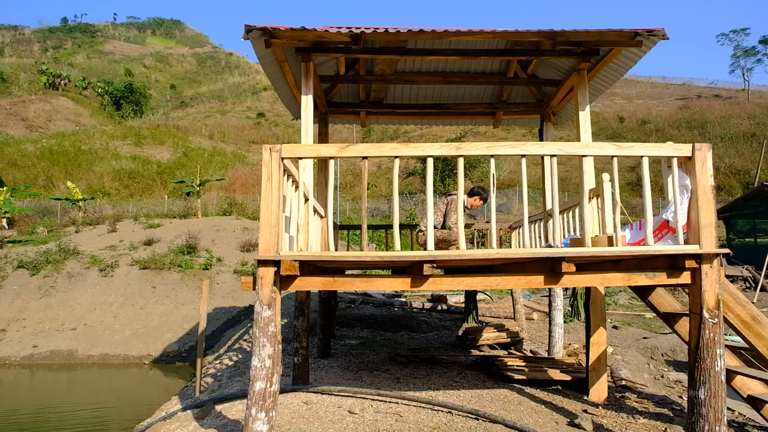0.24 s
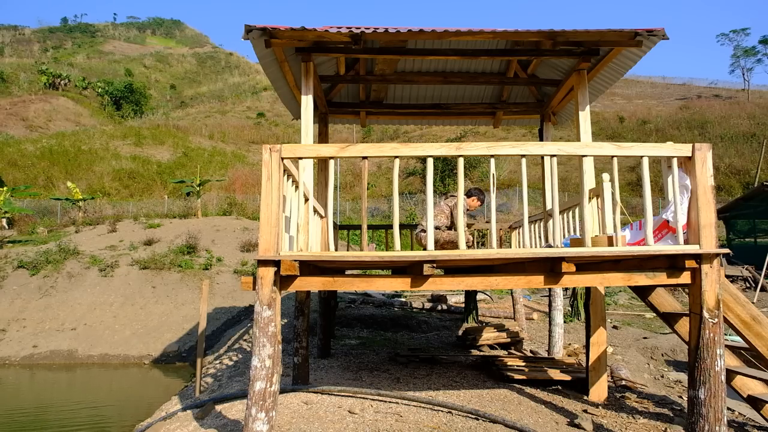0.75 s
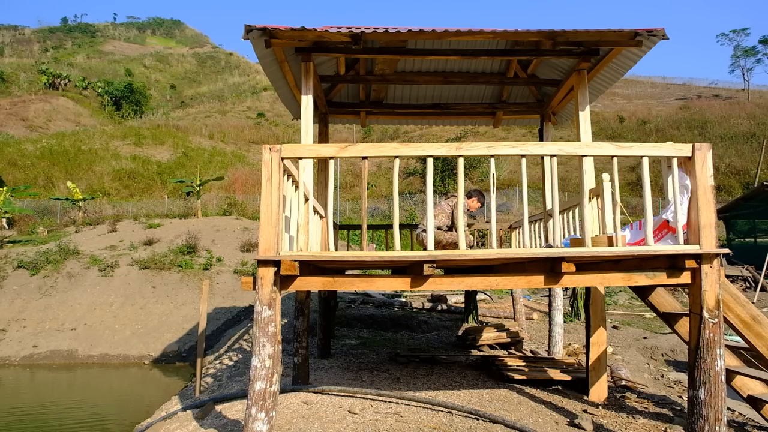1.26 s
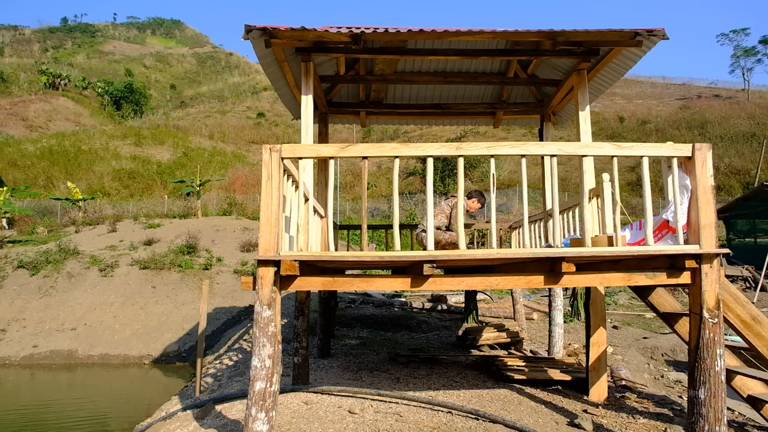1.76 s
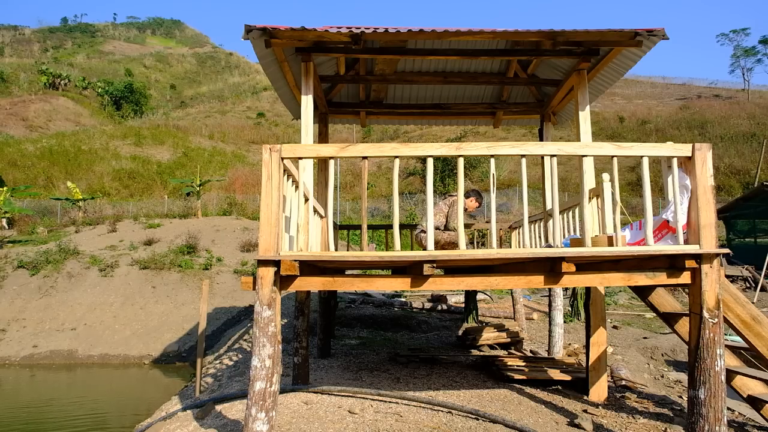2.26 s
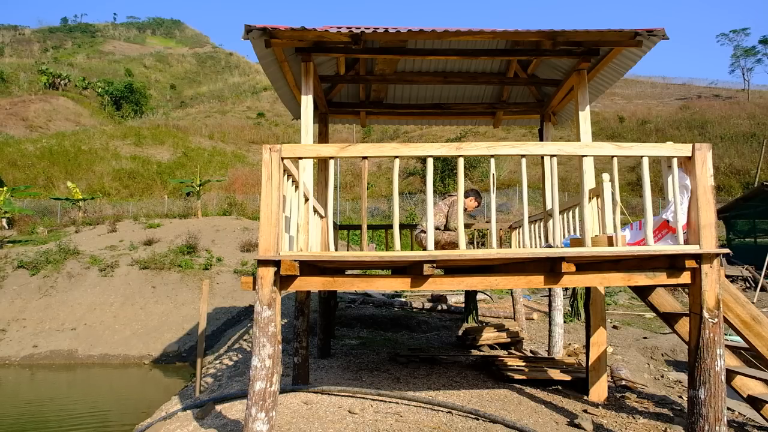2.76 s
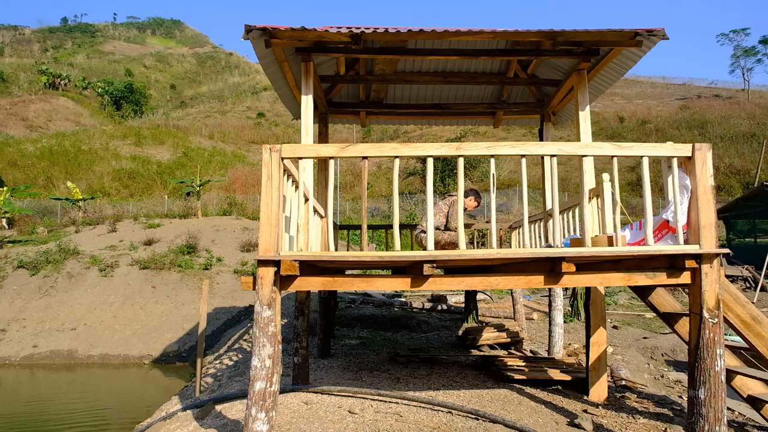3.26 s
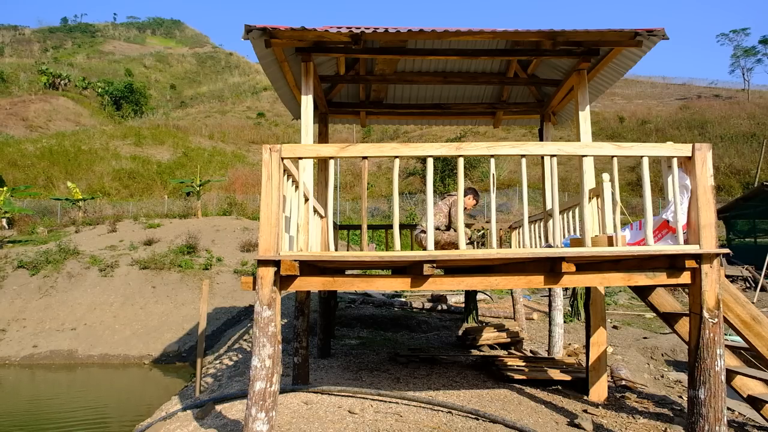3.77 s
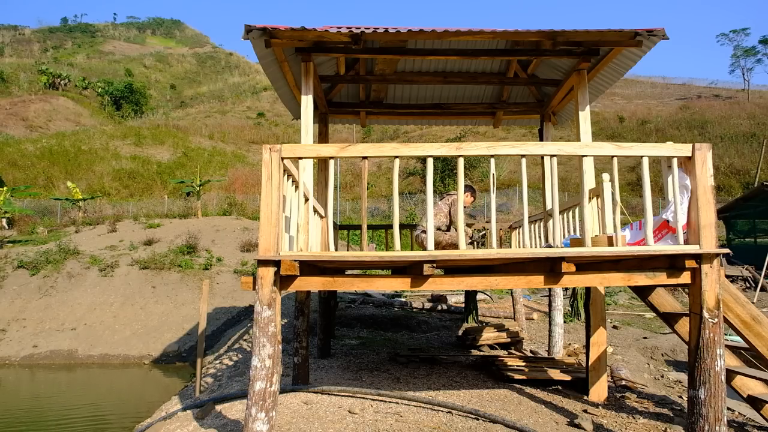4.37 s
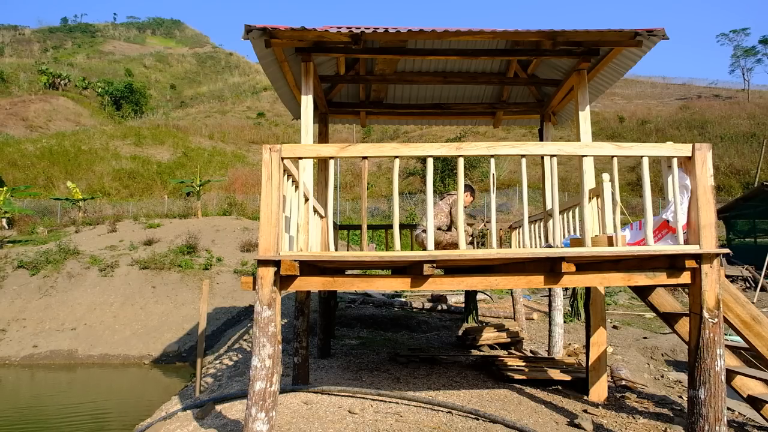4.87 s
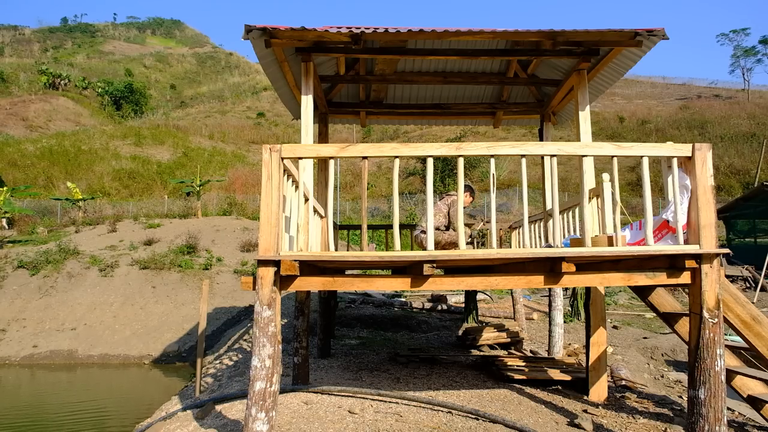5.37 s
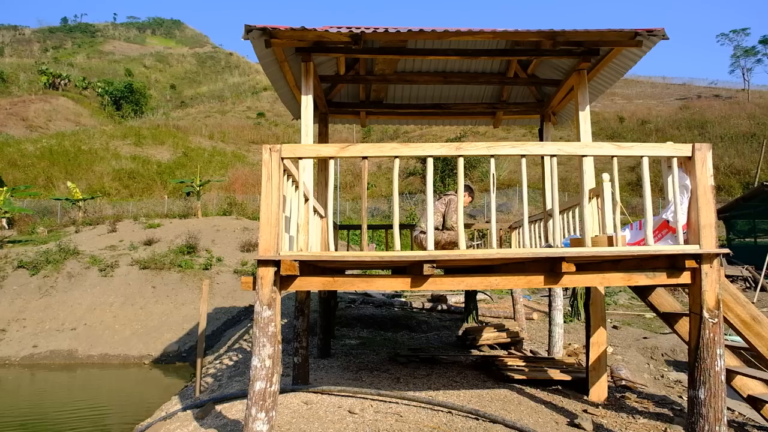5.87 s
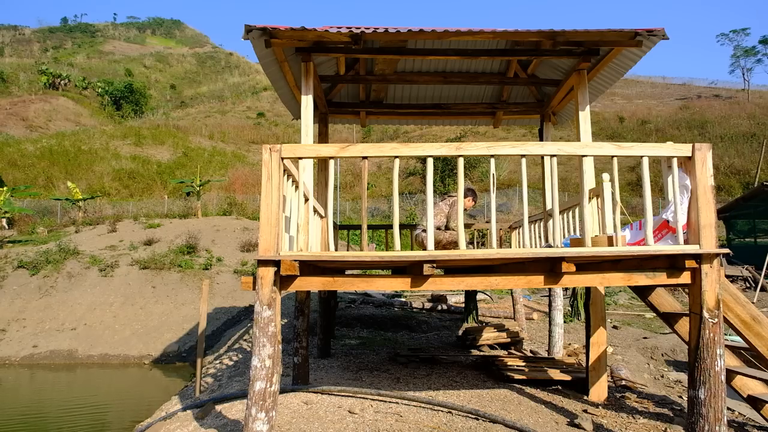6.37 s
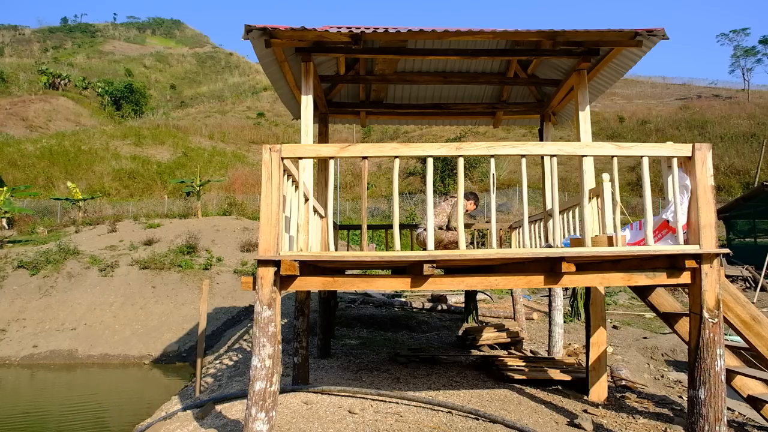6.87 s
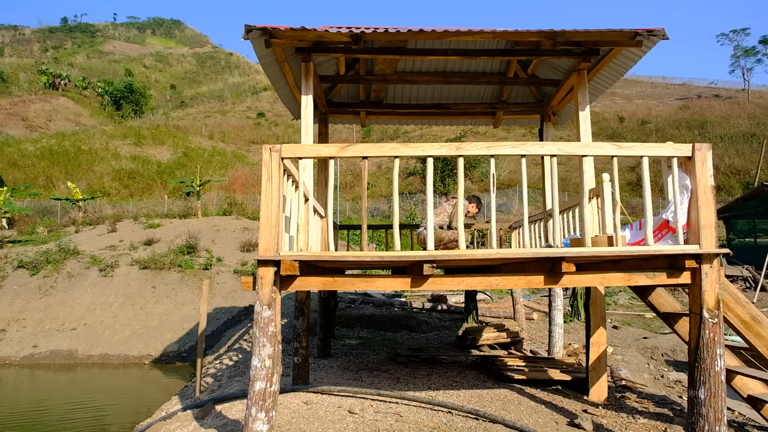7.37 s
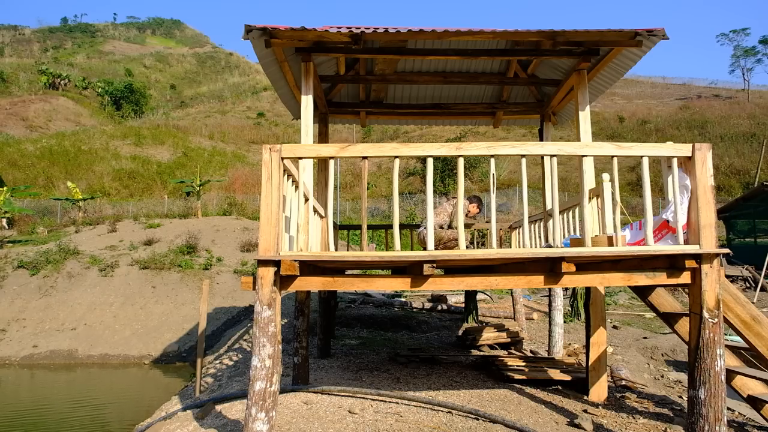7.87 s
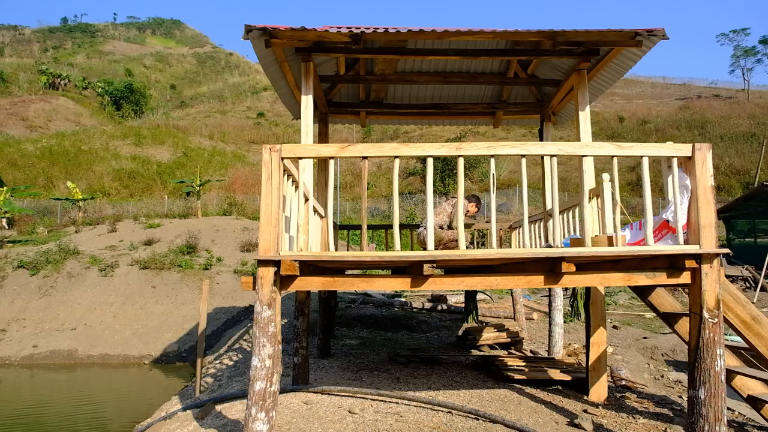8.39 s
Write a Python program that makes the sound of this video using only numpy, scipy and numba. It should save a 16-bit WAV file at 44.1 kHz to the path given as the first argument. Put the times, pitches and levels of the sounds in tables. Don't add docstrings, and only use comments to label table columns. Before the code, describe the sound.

Four hard, distorted hammer blows ring on nail and timber deck, after scattered wooden knocks, while water trickles and spatters close by outdoors.

```python
import sys
import numpy as np
from scipy import signal
from scipy.fft import rfft, irfft
from scipy.io import wavfile
from scipy.ndimage import uniform_filter1d
from numba import njit

SR = 44100
rng = np.random.default_rng(int(sys.argv[2]) if len(sys.argv) > 2 else 0)


def dump(signal):
    limited = np.clip(np.atleast_2d(signal).T, -1, 1)
    pcm = np.round(limited * 32767).astype(np.int16)
    wavfile.write(sys.argv[1], SR, pcm)


def voltage_ratio(level):
    return 10 ** (np.asarray(level, float) / 20)


N = 380583

# t/s, level/dB
WIND = [(0.0, -80), (0.86, -60.5), (1.25, -70), (1.39, -54), (1.6, -54.5), (1.9, -79), (2.4, -92),
        (2.7, -65), (3.5, -80), (3.92, -78), (4.23, -59), (4.73, -72), (6.2, -62), (7.07, -72), (7.28, -72),
        (7.88, -61), (8.17, -72), (8.63, -64)]
# f/Hz, density/dB per Hz
STREAM = [(76, -44), (130, -19.5), (649, -12), (790, -5), (885, 2), (1000, -8.5), (1110, -5), (1420, -11),
          (1740, -7), (2760, -7.5), (4290, -6.5), (5300, -11.5), (5920, -18), (6810, -14), (7840, -23),
          (12400, -25), (15800, -31)]
# t/s, hollow trickle level/dB, spray level/dB
FLOW = [
    (0.0, -46.5, -52),
    (3.72, -47.5, -50),
    (5.24, -46, -50.5),
    (6.59, -45.5, -50.5),
    (8.63, -47, -50),
]
# centre f/Hz, pitch spread/dB, t60/s, level/dB
DROPS = [(3990, 4.5, 0.0057, 1), (934, 2.5, 0.022, -6.5), (1830, 3.5, 0.0067, 0), (8900, 10.5, 0.0048, 8.5)]
# t/s, bright level/dB, fizz above it/dB
SPRAYS = [(0.3306, -35, -26), (0.889, -30.5, -18), (1.1196, -36, -20), (1.3565, -32, -25),
          (1.3742, -29, -20), (1.6156, -31, -20), (2.302, -33, -26), (2.3755, -22.5, -26),
          (3.0547, -34, -24), (3.252, -30.5, -32), (3.5874, -33.5, -13), (3.6403, -36, -17),
          (3.7928, -27.5, -27), (3.884, -33, -34), (3.9792, -30.5, -19), (4.37, -37, -23),
          (4.565, -33, -23), (5.017, -26, -18), (5.1042, -33, -21), (5.496, -34, -15), (6.677, -34, -25),
          (6.734, -33, -23), (6.8491, -31.5, -19), (7.8725, -30.5, -11.5), (8.0585, -37, -10),
          (8.3163, -34, -18.5), (8.428, -27, -15), (8.5372, -34, -26)]
# t/s, bright level/dB, hollow above it/dB, middle above it/dB
SPLASHES = [(0.038, -31.5, 4.5, -7), (0.611, -26.5, 0, -3), (0.6814, -33.5, 8, -2), (1.0152, -28, 0, 1),
            (1.696, -33, 8, -6), (1.714, -25.5, -2, -1), (1.938, -41.5, 12.5, 9), (2.2094, -45, -5.5, 8),
            (2.4546, -32.5, -16, 0), (2.704, -37, 1, 5), (2.712, -30.5, 3, 4.5), (3.1687, -39, -9, 0),
            (3.2083, -36, -11, 3), (3.296, -31, 2, 1), (3.3305, -31.5, 3, -14), (3.904, -33, 1, -2),
            (4.3057, -32, 6, -16), (6.034, -36, -7, -17), (6.1648, -30.5, 4, -4), (6.183, -26, -4, -5),
            (6.218, -32.5, -9, 9.5), (6.5955, -25, -1, 3), (7.108, -31.5, -15, 0.5), (7.4562, -31, 4, 0),
            (7.7075, -30, 2.5, 3.5), (7.855, -34.5, 5, -1), (8.1667, -28.5, 6.5, 2.5), (8.5674, -34, -6, 0),
            (8.6068, -36, 1, 6)]
# t/s, hollow level/dB
GULPS = [(0.0897, -30), (0.8116, -25), (0.9574, -31), (1.2964, -30), (1.8714, -39), (1.9844, -30),
         (2.171, -25), (2.6854, -29), (3.0294, -30), (3.1163, -33), (3.3812, -27.5), (4.4508, -29),
         (6.1482, -35), (6.265, -23.5), (6.8914, -23.5), (7.5264, -29), (7.5524, -31)]
# t/s, bright level/dB, middle above it/dB
TICKS = [(1.616, -19, -2), (1.8801, -41, -8), (2.3012, -26, -9), (2.454, -25.5, -5), (3.1686, -31, -8),
         (4.0028, -21, -23), (6.9074, -30, -11), (7.004, -26, -2), (7.096, -26, -7), (7.108, -32, -6),
         (7.3584, -25, -8), (7.4495, -31, -8), (7.6899, -22, 8), (7.708, -28, -1), (8.0353, -27, -19),
         (8.058, -28, -6), (8.3163, -29, -12), (8.5365, -26, -8), (8.5484, -22, -9)]
# t/s, peak level/dB, f/Hz
BLIPS = [(0.5043, -33, 3570), (0.6115, -28, 4000), (1.617, -25, 4300), (2.2564, -31, 4130),
         (2.3012, -32, 4420), (2.3755, -32, 4170), (2.3872, -24, 3850), (2.4543, -33, 3500),
         (2.72, -26, 3980), (3.1687, -34, 4710), (3.792, -31, 3900), (3.8841, -30, 3990),
         (3.903, -26, 3640), (3.9784, -25, 4100), (4.003, -23, 3700), (4.3046, -28, 4530),
         (4.37, -24.5, 3610), (4.565, -26.5, 4460), (5.016, -29, 3710), (6.907, -33, 3660),
         (7.004, -21, 3650), (7.0954, -36, 3750), (7.359, -28, 3440), (7.4484, -38, 3950),
         (7.6894, -31, 3540), (8.036, -21.5, 4100), (8.058, -22, 3770), (8.0925, -29, 3920),
         (8.1666, -35, 4180), (8.1923, -26, 3780), (8.2402, -28, 4090), (8.3155, -23.5, 3950),
         (8.4267, -27, 4150), (8.537, -24, 3760), (8.5484, -28, 4030),
         (0.6125, -31, 6660), (1.0151, -30, 5590), (1.3723, -30, 6810), (1.737, -31, 7260),
              (2.0562, -31, 7070), (2.377, -26.5, 6550), (2.7252, -33, 6700), (2.9791, -34, 6120),
              (3.1687, -38, 6570), (3.2904, -36, 6220), (3.8267, -32, 6290), (3.922, -35, 6410),
              (3.9779, -33, 6630), (4.0632, -35, 5770), (4.6553, -30, 6600), (5.012, -33, 6500),
              (5.0789, -31, 5500), (6.1769, -30, 6900), (6.5939, -40, 6810), (6.8598, -36, 6830),
              (6.8932, -29, 6300), (7.0973, -38, 6680), (7.1766, -35, 7000), (8.0581, -36, 6750),
              (8.1783, -31, 6680), (8.3155, -32, 6570), (8.4315, -22, 6570),
         (0.961, -23.5, 870), (1.014, -26, 940), (1.88, -24, 1230), (2.213, -27, 2020),
             (2.454, -28, 1880), (2.686, -24.5, 821), (2.712, -22, 1760), (3.907, -27, 2100),
             (6.596, -19, 980), (7.096, -27, 870), (7.53, -28, 1050), (1.718, -27, 1900),
             (2.377, -28, 1030), (2.713, -26, 1100), (7.998, -29, 890), (8.058, -25, 1950),
             (8.155, -22, 1030), (8.337, -33, 826), (8.507, -30, 1010), (8.58, -32, 848)]
# t/s, length/s, level/dB
RUSTLES = [(1.95, .06, -49), (2.06, 0.029, -51), (6.99, 0.026, -46), (7.185, .05, -44), (7.41, 0.15, -47),
           (7.6, 0.028, -40), (7.68, 0.072, -45)]
# t/s, length/s, level/dB
SHUFFLES = [(.42, 0.22, -50), (1.85, 0.9, -60), (2.03, 0.12, -53), (3.1, .15, -59), (6.12, .2, -57),
            (6.5, 0.34, -54), (7.1, 0.04, -53), (7.46, 0.084, -55), (8.6, .1, -61)]

# f/Hz, density/dB per Hz
WOOD = [(35, -61), (60, -42), (227, -5), (679, -4.5), (763, -3.5), (1940, -13.5), (4190, -16), (9050, -19),
        (9930, -17), (14100, -26.5), (15800, -49)]
# f/Hz, t60/s
WOOD_T60 = [(60, 1), (250, 0.33), (600, 0.3), (1500, 0.25), (4000, 0.22), (10000, 0.069), (16000, 0.26)]
# t/s, peak level/dB, strongest board tone f/Hz, contact/ms
KNOCKS = [(0.518, -8.5, 578, 1.03), (0.631, -7, 572, 0.66), (0.642, -11.5, 753, 0.6),
          (0.654, -24, 796, 0.55), (0.681, -9, 623, 0.93), (0.693, -20, 342, 1.1), (0.719, -17.5, 535, 2),
          (0.777, -23.5, 650, 1.2), (0.824, -19.5, 600, 1.36), (1.201, -29, 347, 1.6),
          (1.486, -15.5, 613, 1.35), (1.509, -22, 640, 1.6), (1.532, -38, 616, 1.1),
          (1.586, -22.5, 284, 1.15), (1.619, -25.5, 284, 2.8), (1.66, -40, 262, 2.2),
          (2.044, -29.5, 900, 0.4), (2.137, -19.5, 620, 0.47), (2.149, -20, 927, 0.56),
          (6.217, -20, 810, 0.27), (6.239, -25, 516, 0.92), (6.282, -11, 704, 1.37),
          (6.293, -12.5, 763, 0.93), (6.318, -22, 445, 0.51), (6.349, -25.5, 420, 2.5),
          (6.594, -29, 920, 1.9), (7.095, -41, 860, 0.48), (7.459, -37, 950, 0.77), (8.148, -24, 980, 0.31),
          (8.606, -24, 826, 0.29)]
# t/s, f/Hz, t60/s, level/dB
REBOUNDS = [(.499, 1750, 0.022, -29), (0.6, 530, .03, -28), (.631, 790, 0.037, -12), (.694, 590, .03, -12),
            (1.4855, 624, 0.046, -13.5), (1.497, 580, 0.036, -32), (1.505, 653, .03, -18.5),
            (1.533, 600, 0.034, -22.5), (2.1, 1320, 0.012, -25), (6.216, 1500, 0.012, -20),
            (1, 274, .1, -40), (2.5, 100, 0.082, -41), (7.095, 130, .12, -42.5), (7.74, 106, 0.21, -42),
            (8.15, 900, .06, -27.5), (6.605, 1700, 0.092, -36), (.633, 1400, .05, -20),
            (.52, 1600, .05, -35), (6.87, 6250, 0.11, -46)]
# t/s, f/Hz, t60/s, level/dB
CLINK = (.655, 2440, .09, -31)

# t/s, strength/dB, contact/ms, main boards/dB, slope echo/dB
BLOWS = [
    (-.42, 13, 0.055, -8, -15.5),
    (4.1126, 8.5, 0.05, -11.5, -24.5),
    (4.7459, 8.5, 0.059, -11.5, -24),
    (5.1947, 10, 0.036, -13, -24),
    (5.6612, 9, 0.05, -11.5, -26),
]
# f/Hz, density/dB per Hz
ECHO = [(80, -10), (250, 0.5), (900, -10), (2500, -17.5), (6000, -24), (16000, -49)]
# f/Hz, level/dB, t60/s, delay/s
BOARDS = [(183, -21, .2, .03), (238.4, -16, .2, .036), (272, -18, .3, .002), (329, -10, .24, 0.00602),
          (368, -17, .18, .02), (410.8, -16, .26, .012), (468.5, -6.5, .28, .004),
          (510.8, -5, 0.18, 0.00199), (555, -13, .24, .03), (615, -4, .17, .002), (662, -10, .12, .014),
          (1437, -9, .13, .002)]
# f/Hz, t60/s; then level/dB per blow, changing as the nail sinks
STRUCK = [(710, .24), (785, .26), (856, .22), (910, .2), (962, .2)]
STRUCK_DB = [
    [-17, -17, -11.5, -17.5, -16],
    [-14, -14, -13, -14, -20],
    [-13, -14, -12.5, -10.5, -22],
    [-10, -10, -8.5, -6, -9],
]
# t/s, f/Hz, t60/s, level/dB
SLAPS = [(4.15, 790, 0.11, -12), (4.143, 940, 0.11, -12), (4.765, 1450, .1, -16), (5.212, 912, .1, -8),
         (5.682, 920, 0.071, -3.5), (4.11, 3100, 0.026, 0.5), (4.748, 6000, 0.044, -4),
         (4.75, 3650, .08, -9), (4.76, 3900, .1, -12)]
# f/Hz, spread/Hz
STEEL = [(3480, 300), (4050, 260), (4750, 120), (5600, 400), (7330, 220), (7950, 120), (9850, 60),
         (12200, 200), (13770, 70), (14600, 120)]
STEEL_T60 = [0.11, 0.15, 0.17, 0.12, .17, 0.15, 0.15, 0.12, 0.13, 0.13]
STEEL_DB = [
    [-13, -18, -43, -33.5, -40, -23, -17, -33, -32, -21],
    [-6, -14.5, -46, -13.5, -17.5, -24, -20, -37, -18, -33],
    [-10, -25, -24, -14.5, -22, -34, -18, -32, -27, -28],
    [-13, -18.5, -26, -16.5, -23, -25, -41, -29, -41, -35],
]
CRACK_HZ = [3845, 3990, 3224, 4130]
CRACK_DB = [-0.56, -2.2, 0.39, -1.7]
# f/Hz, t60/s; then level/dB per blow
STRANDS = [(2094, 0.18), (2890, 0.13), (3228, .11), (3466, 0.2), (4143, .2), (5545, 0.28), (7370, 0.24)]
STRANDS_DB = [
    [-32, -15, -13, -14, -14, -39, -32],
    [-19, -14, -14, -13, -12, -25, -22],
    [-18, -14, -11, -17, -20, -24, -26],
    [-15.5, -17, -14, -12, -11, -31, -26],
]
# t/s, f/Hz, drift/Hz per s; then level/dB, t60/s
HEAD = [(-.42, 8549, 0), (4.113, 8562, -80), (4.746, 8540, 30), (5.195, 8532, 60), (5.661, 8555, 0)]
HEAD_RING = [(-24, 0.9), (-27, 0.65), (-41, 0.62), (-30, 0.47), (-26.5, 0.78)]
# t/s, width/s, depth/0-1
HEAD_DIPS = [(4.19, 0.015, .95), (4.282, 0.014, 0.4), (5.265, .04, .95), (5.75, 0.011, .9),
             (5.816, .012, 0.9), (5.838, 0.0088, .6), (5.885, 0.022, 0.9), (5.94, .012, 0.5)]
THUMP_DB = [-36, -32, -25, -20]


def on_log(table, hz):
    f, value = np.transpose(table)
    return np.interp(np.log(hz), np.log(f), value)


@njit
def add(out, start, hz, t60, gain, glide):
    for k in range(len(hz)):
        step = np.exp(2j * np.pi * hz[k] / SR - np.log(1000) / (t60[k] * SR))
        turn = np.exp(2j * np.pi * glide[k] / SR / SR)
        z = gain[k] + 0j
        first = int(start[k] * SR)
        for i in range(first, min(len(out), first + int(1.17 * t60[k] * SR))):
            if i >= 0:
                out[i] += z.imag
            z *= step
            step *= turn


def ring(start, hz, t60, gain, glide=0):
    out = np.zeros(N)
    rows = np.broadcast_arrays(start, np.clip(hz, 20, .45 * SR), np.maximum(t60, .001), gain, glide)
    add(out, *(np.ravel(v) * 1. for v in rows))
    return out


def ring_events(table):
    s, hz, t60, db = np.transpose(table)
    return ring(s, hz, t60, voltage_ratio(db))


def band(lo_hz, hi_hz, table):
    hz = np.maximum(np.arange(N // 2 + 1) * SR / N, 1)
    edges = np.sqrt((1 + (lo_hz / hz) ** 8) * (1 + (hz / hi_hz) ** 8))
    return irfft(rfft(rng.standard_normal(N)) * voltage_ratio(on_log(table, hz)) / edges, N)


def walk(rate):
    hold = int(SR / rate)
    steps = np.repeat(rng.standard_normal(N // hold + 1), hold)
    return 0.91 * uniform_filter1d(uniform_filter1d(steps, hold), hold)[:N]


def high_pass(x, edge_hz, order=3):
    return signal.sosfilt(signal.butter(order, edge_hz, "high", fs=SR, output="sos"), x)


def wind(db):
    calm = band(14.2, 58, [(20, 5), (70, -5)])
    gusts = band(14, 294, [(20, -19.0), (70, -1.5), (130, -13.5), (300, -14.5)])
    calm_db = -76
    return voltage_ratio(db + 29.5 + 6.1 * walk(6.5)) * gusts + voltage_ratio(calm_db) * calm / np.std(calm)


def stream(hollow_db, spray_db):
    water, swell = 0, walk(3.46)
    for hz in 130 * 2 ** np.arange(0, 7.2, 1 / 2):
        spray_share = np.interp(np.log(hz), np.log([1200, 2500]), [0, 1])
        db = 0.21 * swell + 2.0 * walk(22) + spray_share * (spray_db - hollow_db)
        water = water + voltage_ratio(db) * band(hz / 2 ** (1 / 4), hz * 2 ** (1 / 4), STREAM)
    at, pitch, size = rng.random((5000, 3)).T
    hz = 500 * 2 ** (4.6 * pitch)
    size_db = -4.9 * np.log(size + .08)
    gain = voltage_ratio(on_log(STREAM, hz) + size_db - 14.5) * np.sqrt(hz / 1000)
    bubbles = ring(at * N / SR, hz, 16 / hz, gain, glide=0.016 * hz ** 2)
    return voltage_ratio(hollow_db + 16.5) * (water + high_pass(bubbles, 434))


def spatters(s, bright_db, hollow_db, middle_db, fizz_db, length_s):
    parts_db = np.transpose(np.broadcast_arrays(0 * s, hollow_db, middle_db, fizz_db))
    db = bright_db[:, None] + parts_db
    when, also, pitch, size = rng.random((len(s), 4, 4, 26)).transpose(1, 0, 2, 3)
    hz, spread_db, t60, part_db = (column[:, None] for column in np.transpose(DROPS))
    same = .35
    pitch = same * pitch[..., :1] + (1 - same) * pitch
    start = s[:, None, None] - .1 * length_s + length_s * when * also
    gain = voltage_ratio(db[..., None] + part_db - 3.5) * size
    return high_pass(ring(start, hz * voltage_ratio(spread_db * (pitch - .5)), t60, gain), 590)


def crackle(count):
    at, size, hollow, middle, fizz = rng.random((count, 5)).T
    bright_db = -47 - 3.7 * np.log(size + .2)
    return spatters(at * N / SR, bright_db, 12 * hollow - 11, 16 * middle - 13, 14 * fizz - 25, length_s=.012)


def splashing():
    s, db, fizz_db = np.transpose(SPRAYS)
    out = spatters(s, db, -3, -8, fizz_db, length_s=0.028)
    out += spatters(*np.transpose(SPLASHES), fizz_db=-20, length_s=0.027)
    s, hollow_db = np.transpose(GULPS)
    bright_db, middle_db, fizz_db = -12, -11, -26.5
    out += spatters(s, hollow_db + bright_db, -bright_db, middle_db - bright_db, fizz_db - bright_db,
                    length_s=0.023)
    s, db, middle_db = np.transpose(TICKS)
    drop_db = -13
    return out + spatters(s, db + drop_db, -21, middle_db, -18.5, length_s=0.0025)


def blips():
    s, db, hz = np.transpose(BLIPS)
    t60 = 32 * np.sqrt(hz / 4000) / hz
    gain, rise = voltage_ratio(db + 1), 0.006 * hz ** 2
    return ring(s, hz, t60, gain, rise) - ring(s, hz, t60 / 4, gain, rise)


def swells(table, lo_hz, hi_hz, flutter_db):
    s, length, db = np.transpose(table)[..., None]
    since = np.arange(N) / SR - s
    shape = np.sum(voltage_ratio(db) * np.exp(-2 * (since / (length / 2)) ** 2), axis=0)
    noise = band(lo_hz, hi_hz, [(100, 5), (8000, -12)])
    return shape * voltage_ratio(flutter_db * walk(90)) * noise / np.std(noise)


def deck(s, db, contact_ms, damping, spread_s, top_hz, light, count, alike_hz=0):
    place, late, share = rng.random((len(s), 3, count)).transpose(1, 0, 2)
    place = (np.arange(count) + place) / count
    hz = 80 + top_hz * place ** (3 / 2)
    alike = hz[0] < alike_hz
    hz, late, share = [np.where(alike, v[0], v) for v in (hz, late, share)]
    density = np.sqrt(top_hz * np.sqrt(place) / 250 / count)
    gain = (2 * share - 1) * density * voltage_ratio(db[:, None] + on_log(WOOD, hz))
    cycles = hz * contact_ms[:, None]
    gain /= 1 + (cycles / 1000) ** 3
    gain /= np.sqrt(1 + (light / cycles) ** 4)
    t60 = damping[:, None] * on_log(WOOD_T60, hz) * voltage_ratio(7.0 * np.roll(late, 1, axis=1) - 5.5)
    return ring(s[:, None] + spread_s * late ** 3, hz, t60, gain)


def knocks():
    s, db, board_hz, contact_ms = np.transpose(KNOCKS)
    damping = 0.45 + 0.38 * contact_ms
    board = ring(s, board_hz, .12 * damping, voltage_ratio(db - 8.0))
    board += ring_events([CLINK]) + ring_events(REBOUNDS)
    low = deck(s, db + 2.0, contact_ms, damping, spread_s=0.00805, top_hz=4980, light=270, count=300)
    return high_pass(board + low, 162)


def slope_echo():
    s, echo_db = np.transpose(BLOWS)[[0, 4]]
    since = np.arange(N) / SR - s[:, None]
    wash = voltage_ratio(echo_db[:, None] - 60 * np.abs(since)) * np.clip(since / 0.0203, 0, 1)
    echo = band(40, 16940, ECHO)
    return echo / np.std(echo) * np.sum(wash, axis=0)


def cluster(at, hz, spread_hz, t60, db, spread_s, count):
    detune, late = rng.random((len(hz), 2, count)).transpose(1, 0, 2)
    place = (np.arange(count) + detune) / count - .5
    partner_hz = hz[:, None] + spread_hz[:, None] * place
    return ring(at + spread_s * late, partner_hz, t60[:, None], voltage_ratio(db)[:, None])


def struck_boards():
    s, db, contact_ms, boards_db, _ = np.transpose(BLOWS)
    out = deck(s, db, contact_ms, np.full(len(s), 0.86), spread_s=.022, top_hz=16915, light=16.4,
               count=1800, alike_hz=1100)
    hz, mode_db, t60, late_s = np.transpose(BOARDS)
    for at, all_db in zip(s, db + boards_db):
        out += cluster(at + late_s[:, None], hz, hz / 60, t60, mode_db + all_db, spread_s=.0003, count=2)
    out += ring(s[1:, None] + 0.003945, *np.transpose(STRUCK), voltage_ratio(STRUCK_DB))
    return out + ring_events(SLAPS)


def hammer_head():
    at, hz, drift = np.transpose(HEAD)
    db, t60 = np.transpose(HEAD_RING)
    dip_s, width, depth = np.transpose(HEAD_DIPS)[..., None]
    dips = depth * np.exp(-((np.arange(N) / SR - dip_s) / width) ** 2)
    return np.prod(1 - dips, axis=0) * ring(at, hz, t60, voltage_ratio(db), glide=drift)


def struck_steel():
    s = np.transpose(BLOWS)[0, 1:]
    out = ring(s, CRACK_HZ, 0.039, voltage_ratio(CRACK_DB))
    for at, steel_db in zip(s, STEEL_DB):
        out += cluster(at, *np.transpose(STEEL), np.array(STEEL_T60), steel_db, spread_s=.012, count=5)
    hz, t60 = np.transpose(STRANDS)
    gain, at = voltage_ratio(STRANDS_DB), s[:, None]
    out += ring(at, hz, t60, gain)
    out += ring(at + .006, hz * 1.011, t60, gain * voltage_ratio(-9))
    return out + ring(at + 0.0097, hz * .976, t60 * 0.74, gain * voltage_ratio(-6))


def blows():
    return high_pass(slope_echo() + struck_boards() + hammer_head() + struck_steel(), 124)


def scene():
    t = np.arange(N) / SR
    s, hollow_db, spray_db = np.transpose(FLOW)
    out = wind(np.interp(t, *np.transpose(WIND)))
    out += stream(np.interp(t, s, hollow_db), np.interp(t, s, spray_db))
    out += crackle(count=700) + splashing() + blips()
    out += swells(RUSTLES, 990, 4900, flutter_db=5) + swells(SHUFFLES, 200, 690, flutter_db=2.5)
    return (out + knocks() + blows())[None]


def low_pass(x):
    return signal.sosfilt(signal.butter(12, 15990, fs=SR, output="sos"), x)


def record(dry):
    ceiling = 1.05
    flat = dry / (1 + np.abs(dry / ceiling) ** 14) ** (1 / 14)
    thump = ring(np.transpose(BLOWS)[0, 1:], 45, 0.14, voltage_ratio(THUMP_DB))
    return low_pass(flat + thump)


dry = scene()
out = record(dry)
dump(out)
```